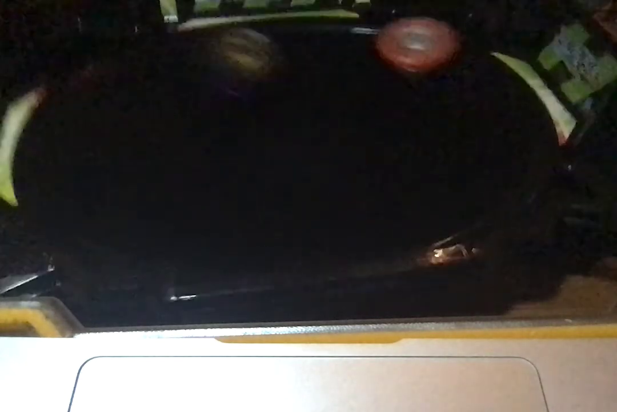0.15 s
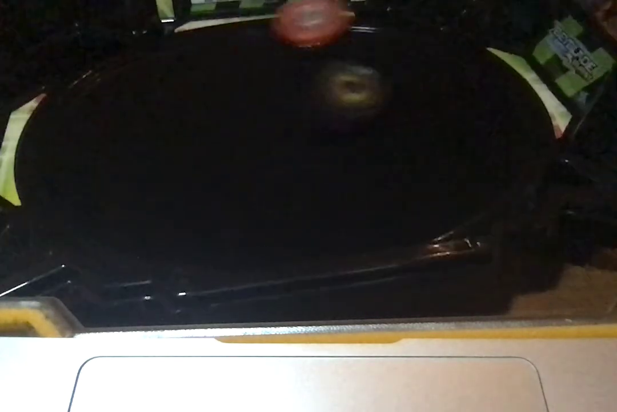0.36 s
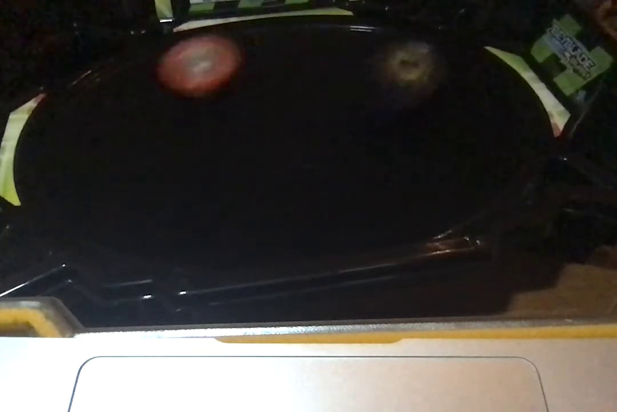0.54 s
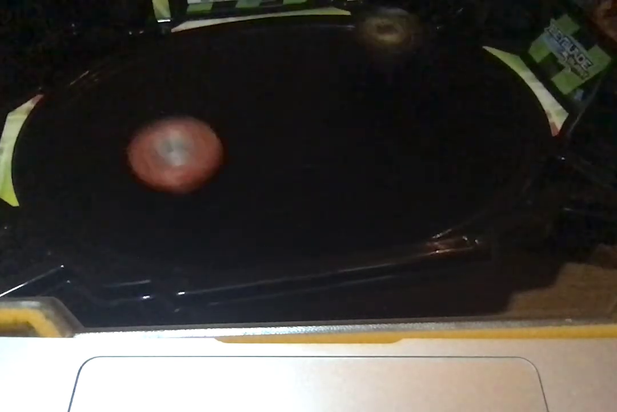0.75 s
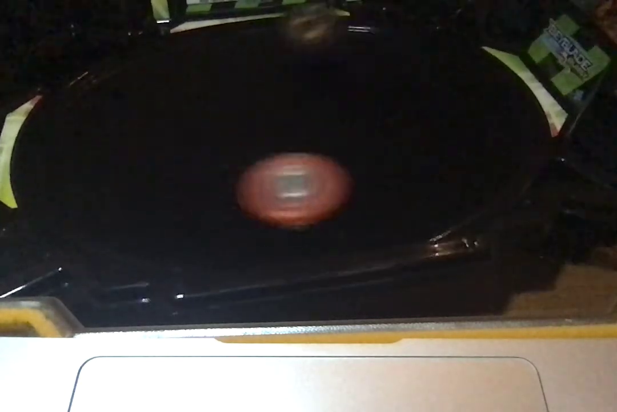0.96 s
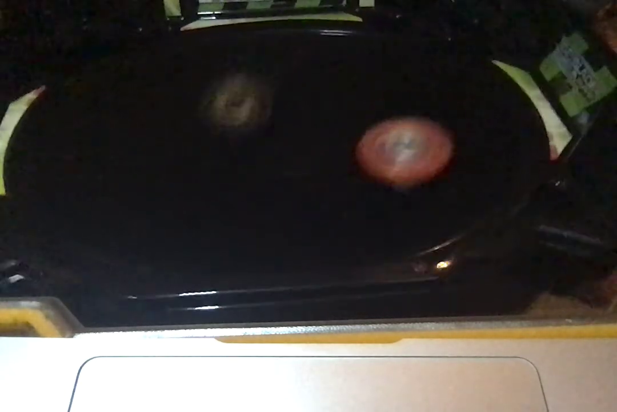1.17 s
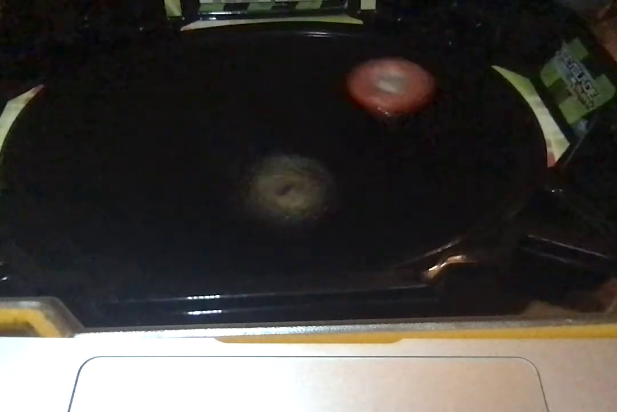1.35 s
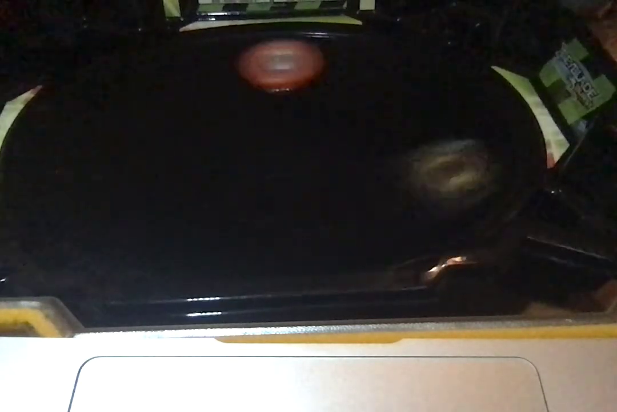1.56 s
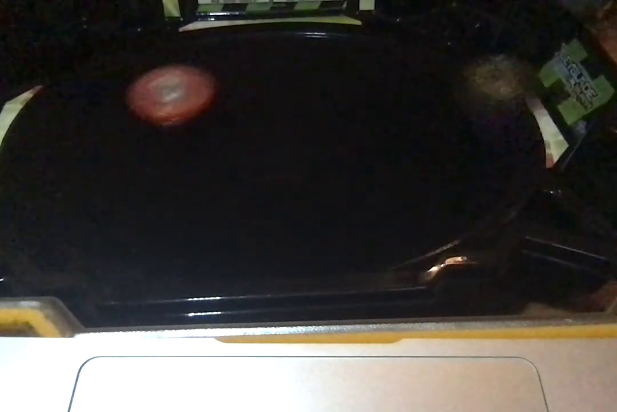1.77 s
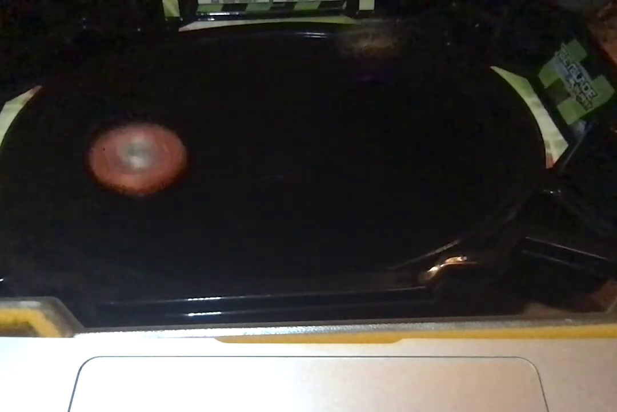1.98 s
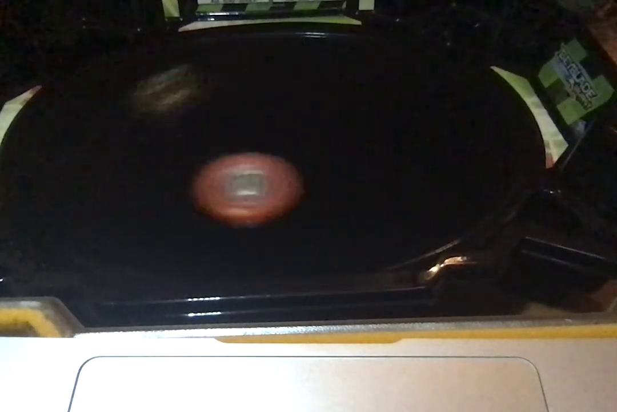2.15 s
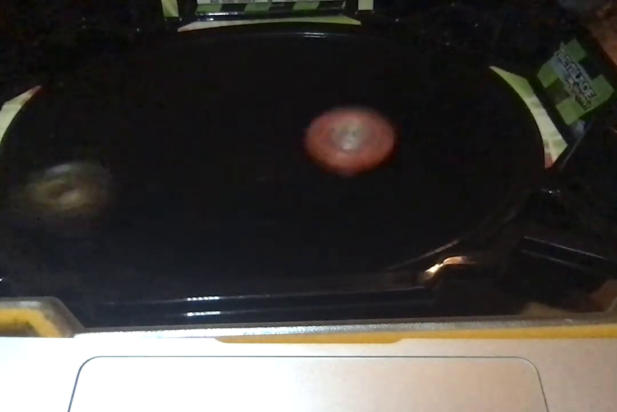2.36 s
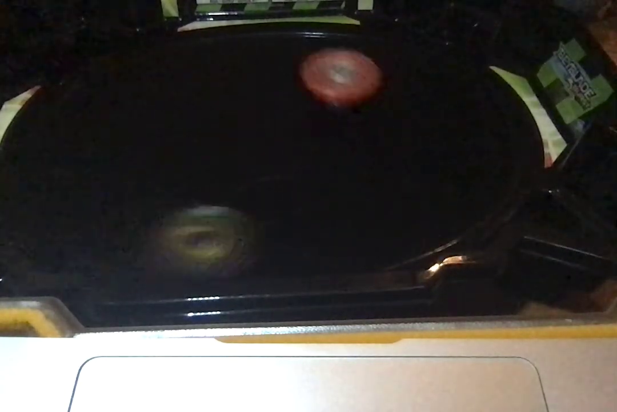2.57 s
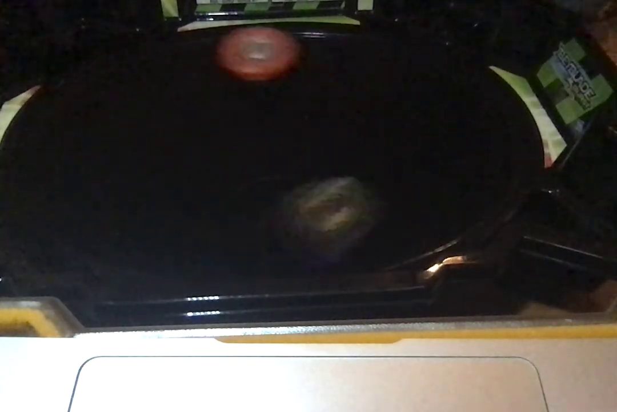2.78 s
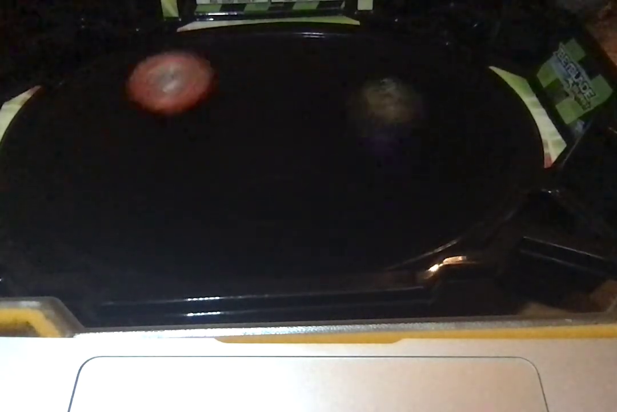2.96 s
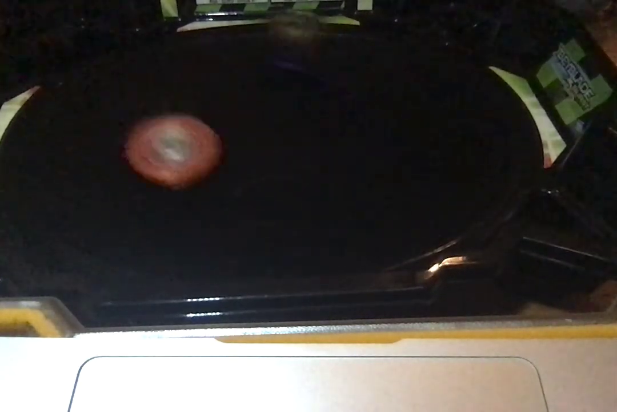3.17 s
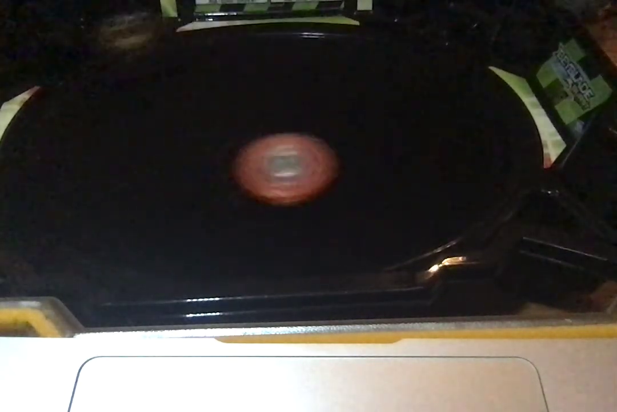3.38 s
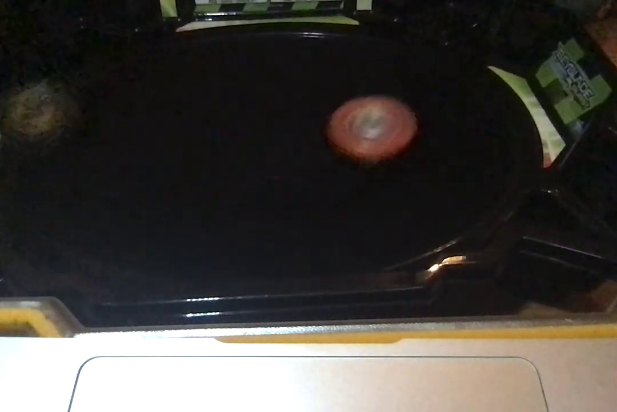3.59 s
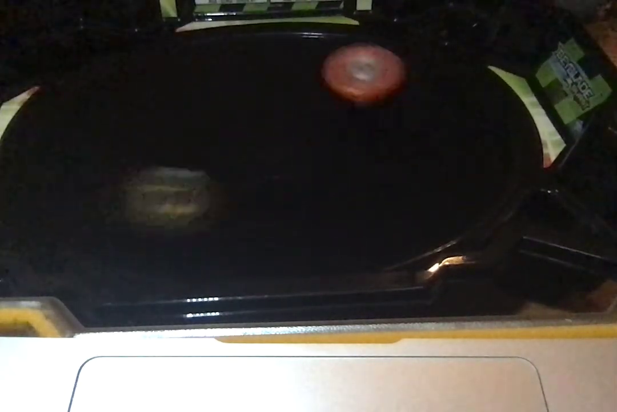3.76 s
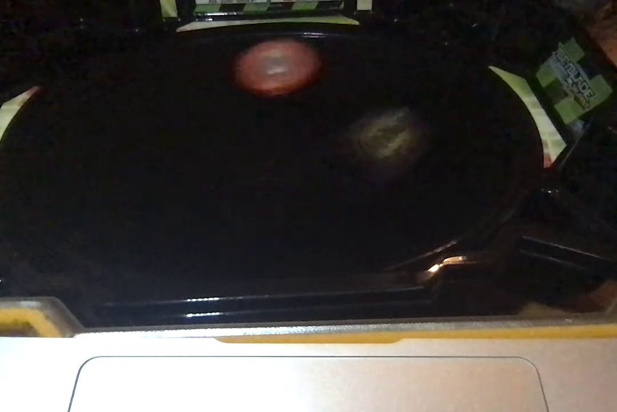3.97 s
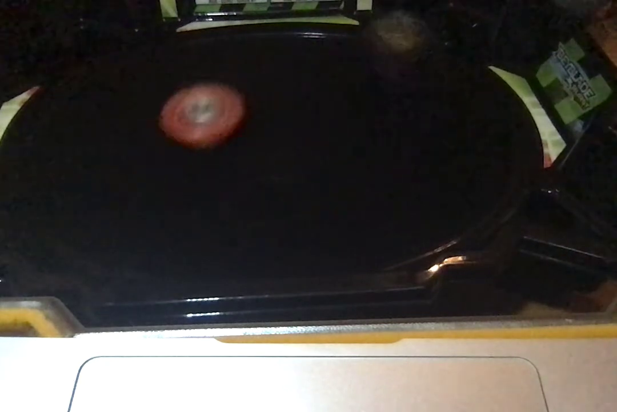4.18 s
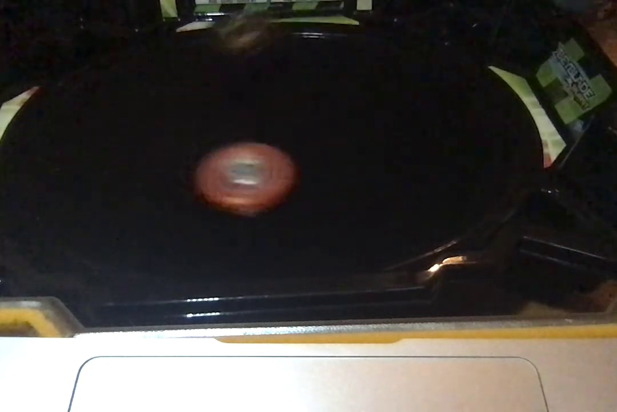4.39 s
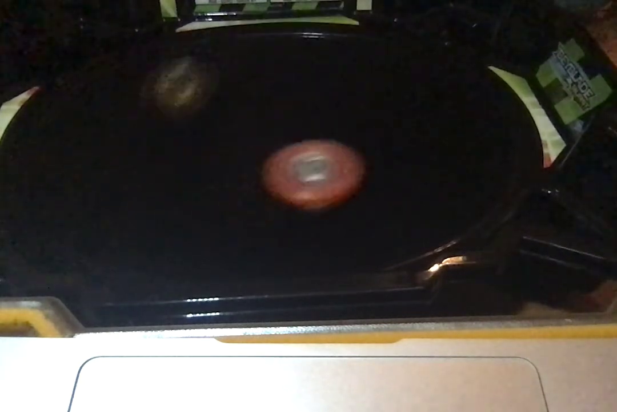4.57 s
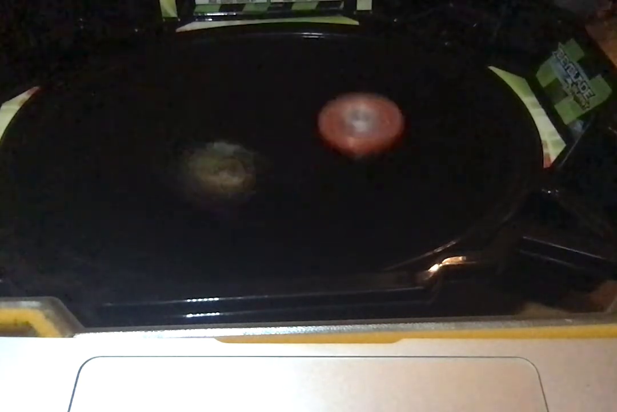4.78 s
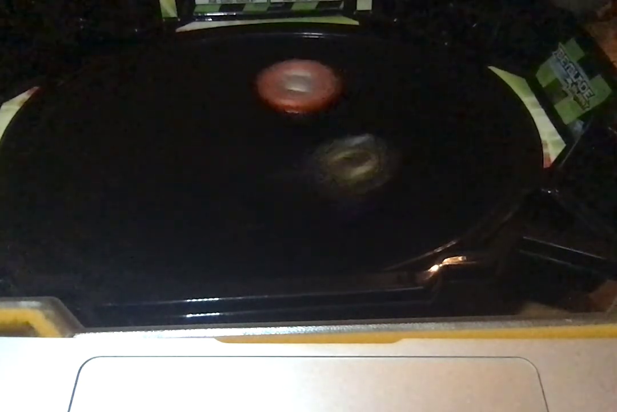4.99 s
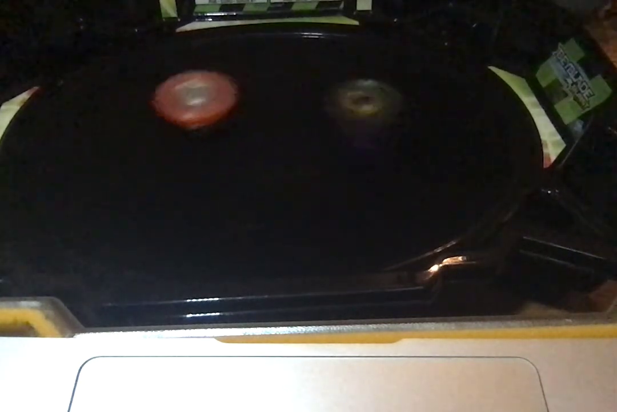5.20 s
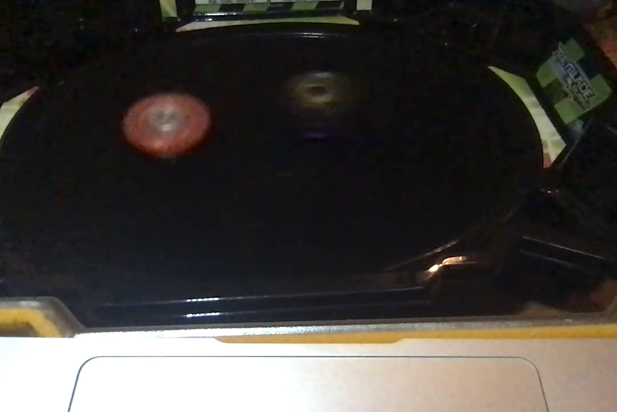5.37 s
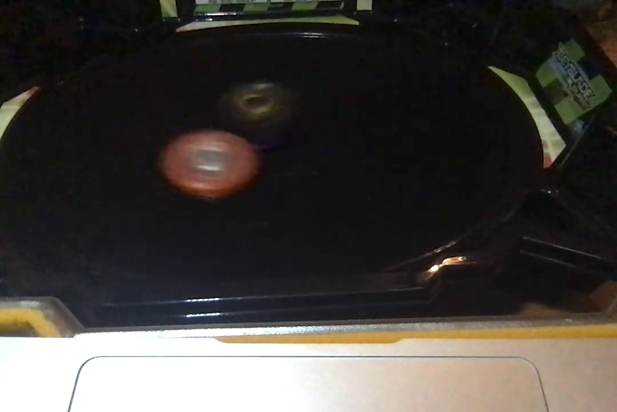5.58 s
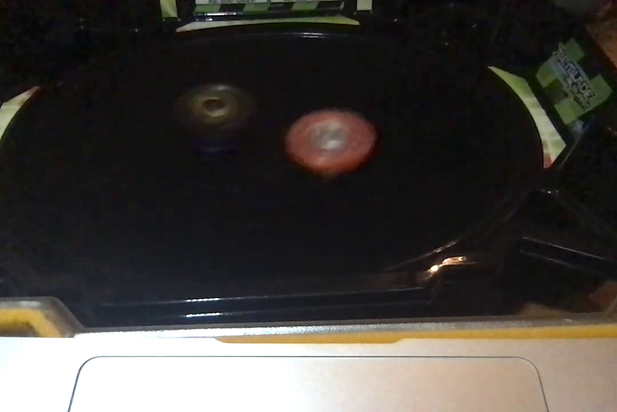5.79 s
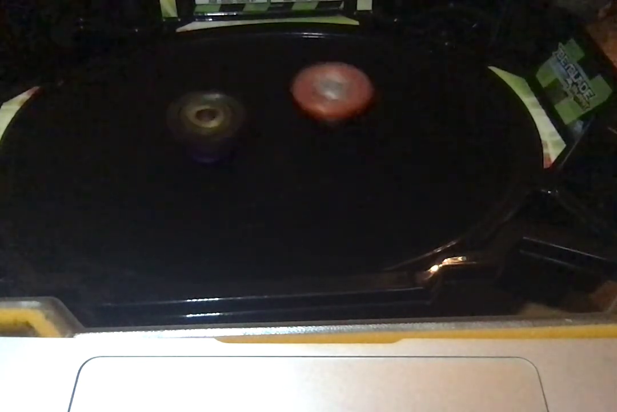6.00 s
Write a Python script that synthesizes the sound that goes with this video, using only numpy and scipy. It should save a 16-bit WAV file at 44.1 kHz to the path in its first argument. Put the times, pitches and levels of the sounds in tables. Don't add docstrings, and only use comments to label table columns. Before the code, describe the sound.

A quick ratchet click, then two or three heavy, distorted thuds as toy tops land in a thin plastic bowl. Uneven clattering and gritty scraping follow over a low, throbbing table rumble. Taps become rapid, even ticking runs and thin out. Near the end, metal rims clash once, sharply, and the low hum fades. The microphone is very close, on the same table, in a small room.

```python
import sys
import numpy as np
from scipy import signal
from scipy.fft import rfft, irfft, next_fast_len
from scipy.io import wavfile
from scipy.ndimage import uniform_filter1d, map_coordinates

SR = 44100
rng = np.random.default_rng(int(sys.argv[2]) if len(sys.argv) > 2 else 0)


def persist_wave(psi):
    counts = np.round(np.clip(psi, -1, 1) * 32767).astype(np.int16)
    wavfile.write(sys.argv[1], SR, np.atleast_2d(counts).T)


def volts(x):
    e = np.asarray(x, float) / 20
    return 10 ** e


N = 266364

# (time [s], level [dB])
LAUNCH_S_DB = [
    (0, -10),
    (.003, -7),
    (.012, -13),
    (.017, -21.5),
    (.021, -18),
    (.034, -16.5),
]
# (frequency [Hz], density [dB/Hz])
RATCHET_HZ_DB = [(180, -44.5), (300, -18.5), (1840, -24), (2320, -11), (7560, -1), (14700, -18),
                 (16000, -31)]
# (time [s], bowl rocking [dB], tip drag [dB])
SLIDE_S_DB = [(0, -28.5, -42), (.1, -25.5, -24.5), (.3, -27.5, -35), (.85, -36, -43), (1.25, -32, -33.5),
              (1.75, -41, -49), (2.2, -30.5, -36.5), (2.6, -37.5, -47.5), (3.1, -35, -44),
              (3.35, -37.5, -45.5), (3.52, -29, -47.5), (3.7, -50, -49), (4.3, -42, -53), (4.6, -43, -49.5),
              (4.85, -36, -48), (5.05, -55, -58), (5.35, -49, -55.5), (6.04, -61, -65.5)]
# (frequency [Hz], density [dB/Hz])
RUMBLE_HZ_DB = [(12, -38), (20, -13), (69, 0), (208, -20.5), (400, -35.5), (520, -61), (880, -120)]
# (frequency [Hz], width [Hz], level [dB])
FLOOR_HZ_HZ_DB = [(316, 110, -6), (431, 24, 2.5), (696, 225, 0.5), (930, 111, 2.5), (1127, 160, 1),
                  (1581, 324, -1), (1799, 470, -7), (2480, 130, -14.5)]
# (frequency [Hz], width [Hz], level [dB])
TIP_HZ_HZ_DB = [(3005, 690, -5.5), (3840, 420, -6.5), (4435, 640, -14), (6394, 465, 0), (6970, 540, 0.5),
                (8060, 630, 0.5), (9650, 180, -37.5), (12800, 1500, -32.5)]
# (time [s], peak [dB], first pitch [Hz], swell [s], direction [+1/-1])
THUDS_S_DB_HZ_S = [
    (.0365, 2.5, 175, .007, 1),
    (.1325, 3, 112, .0055, -1),
    (.174, -4.5, 125, .007, -1),
]
# (time [s], click [dB], floor knock re click [dB])
SKIPS_S_DB = [(0.1203, -36.5, 12), (0.1316, -23.5, 3), (0.176, -21.5, 9.5), (.2007, -25.5, 7),
              (0.2242, -22.5, 0.5), (0.2637, -26, 4.5), (0.3131, -21, -3), (.348, -20.5, -8.5),
              (0.3824, -22.5, -2), (0.4247, -19, -4), (0.47, -22.5, -6), (0.494, -36, 6),
              (0.5071, -24.5, 2), (0.5406, -30.5, 3), (0.5616, -25, -1.5), (0.5889, -31, 3.5),
              (.6081, -25.5, -2), (0.645, -19, -4.5), (0.6832, -31, 2.5), (0.701, -30, -12),
              (0.7239, -33.5, -2), (.749, -31, -5), (0.7721, -29.5, -0.5), (0.7918, -35, 2),
              (.851, -33, 1.5), (.8868, -32, -1.5), (0.926, -25, -1), (.9891, -31, -6.5),
              (1.0396, -36, -13), (1.0803, -26.5, -5.5)]
# (time [s], click [dB], floor knock re click [dB], bounce re click [dB])
BUMPS_S_DB = [(1.2708, -24, -4.5, -15), (1.2953, -18.5, -5, -8), (1.335, -21.5, 1.5, -15),
              (1.3757, -24, -2, -1.5), (1.4951, -29, 5, -12), (1.5418, -35.5, -1, -14),
              (1.5757, -27, 2, -22), (1.6953, -28.5, -4, -25), (1.7478, -44, 3.5, -3), (1.819, -37, -4, -6),
              (1.848, -36.5, -2.5, -4), (2.2166, -29, 0.5, -14), (2.2758, -27.5, -1, -1),
              (2.3038, -15.5, -1, -14), (2.3688, -26, 7.5, -21), (2.42, -34.5, 11, -21),
              (2.4576, -32.5, 8, -8), (2.4902, -34.5, 7.5, -15), (2.5593, -20, 8.5, -11),
              (3.2868, -17, -11.5, -30), (2.6586, -35, 9, -18), (2.6739, -30.5, 8.5, -17),
              (2.7044, -24, 1, -8.5), (2.747, -29, -2.5, -26), (2.952, -34.5, 5.5, -21),
              (3.4559, -22, -5.5, -23), (3.49, -33.5, -1, -15), (4.2077, -25, 5.5, -9.5),
              (4.2635, -28, -5, -22), (4.2988, -37, 1.5, -13)]
# (first tap [s], last tap [s], first level [dB], last level [dB], knock re tap [dB])
RUNS_S_DB = [(1.096, 1.1663, -32, -21.5, -7), (1.1533, 1.2568, -26, -24, -3.5),
             (1.4257, 1.464, -29.5, -31.5, 4), (1.613, 1.655, -33, -31.5, 4.5),
             (1.873, 2.155, -32, -26, -9), (1.8872, 2.233, -30.5, -26.5, 0),
             (2.784, 2.9114, -29.5, -29, -2.5), (2.9887, 3.2523, -28, -22.5, -7.5),
             (3.007, 3.175, -23.5, -40.5, -2), (3.346, 3.378, -35, -34.5, 3),
             (3.5462, 3.682, -32.5, -34.5, -1), (3.7, 3.914, -32, -26, -0.5),
             (3.933, 4.187, -29, -34, -1.5), (4.411, 4.5845, -35, -28.5, -1.5),
             (4.6049, 4.777, -29.5, -31, -2.5), (4.8, 4.8944, -26.5, -38, -3.5),
             (4.959, 5.013, -45.5, -50, 3.5), (5.255, 5.4387, -41, -40.5, -1)]
RUN_TAPS = [4, 5, 3, 4, 11, 13, 5, 9, 6, 2, 5, 13, 15, 10, 10, 6, 3, 10]
# (frequency [Hz], density [dB/Hz])
SNAP_HZ_DB = [(300, -28), (1500, -4), (5000, 1.5), (8000, -14), (16000, -38)]
# (time [s], spin [turns/s])
SPIN_S_HZ = [(.24, 64), (.9, 62), (1.7, 59), (2.5, 57.5), (4.1, 55), (4.5, 52), (4.9, 51), (5.35, 48.5),
             (6.04, 45)]
# (time [s], once-a-turn shake [dB], twice-a-turn rock [dB])
WOBBLE_S_DB = [(.24, -33.5, -51), (.82, -21.5, -53), (1.1, -35, -56), (1.4, -21.5, -58), (1.84, -40, -56),
               (2.27, -22, -59), (2.85, -43, -65), (3.14, -27, -66), (3.55, -38, -57), (3.72, -28, -28),
               (3.86, -21.5, -45), (4.01, -40, -25), (4.25, -31.5, -44), (4.59, -36.5, -30),
               (4.85, -29.5, -38.5), (5.08, -38, -47.5), (5.319, -32, -46.5), (6.04, -43.5, -44.5)]
# (time [s], rate [hops/s])
HOP_S_HZ = [(.3, 43), (1.2, 39.5), (2, 35.2), (2.35, 34), (3.15, 30.3), (3.6, 29.5)]
# (time [s], once-a-hop heave [dB], once-a-turn shake [dB], landing slap [dB])
HEAVE_S_DB = [(0.3, -36, -49, -45), (0.52, -27, -23, -34), (0.74, -26, -37, -36), (0.96, -41, -42, -49.5),
              (1.18, -28, -27, -31), (1.4, -30, -28, -35.5), (1.62, -32, -31, -42.5),
              (1.84, -39, -28.5, -35.5), (2.06, -38, -33, -30), (2.28, -25, -17.5, -32.5),
              (2.5, -32.5, -36, -39.5), (2.72, -28.5, -25.5, -36), (2.94, -34, -64, -36),
              (3.16, -29.5, -52, -26), (3.38, -36, -43, -50), (3.6, -49, -32, -51)]
# (time [s], level [dB])
CLASH_S_DB = [
    (5.575, -34.5),
    (5.580, -24),
    (5.599, -9),
    (5.621, -35),
]
# (frequency [Hz], density [dB/Hz])
CRACK_HZ_DB = [(180, -59), (300, -18), (2070, -12), (3240, -9.5), (4020, -13.5), (6960, 1), (9230, -1),
               (16000, -21)]
# (frequency [Hz], t60 [s])
ROOM_HZ_S = [(1000, 0.35), (9000, 0.36), (13000, 0.04)]
# (frequency [Hz], density [dB/Hz])
HUSH_HZ_DB = [(150, -42.5), (250, -11), (631, -15.5), (846, -5), (1280, -28.5), (8800, -29), (10500, -56),
              (22000, -120)]

SETTLE_S, SLOW_S = 3.6, 4.95


def unit(x):
    return x / np.sqrt(np.mean(x ** 2) + 1e-20)


def along(points, hz):
    f, v = np.transpose(points)
    return np.interp(np.log(hz + 1), np.log(f + 1), v)


def curves(rows):
    s, *cols = np.transpose(rows)
    return [np.interp(np.arange(N) / SR, s, c) for c in cols]


def wobble(rate_hz):
    knots = rng.standard_normal(int(N * rate_hz / SR) + 4)
    return map_coordinates(knots, [np.arange(N) * rate_hz / SR])


def filtered(x, response):
    m = next_fast_len(N + SR // 2)
    return irfft(rfft(x, m) * response(np.fft.rfftfreq(m, 1 / SR)), m)[..., :N]


def body(modes):
    def response(f):
        total = 0
        for k, (hz, width_hz, db) in enumerate(modes):
            damping = 1j * f * width_hz
            total = total + (-1) ** k * volts(db) * damping / (hz * hz - f * f + damping)
        return total
    return response


def dull(hz):
    return 1 / np.sqrt(1 + (hz / 9300) ** 6)


def muffled(hz):
    return dull(hz) ** 4


def noise(spectrum):
    return unit(filtered(rng.standard_normal(N), lambda hz: volts(along(spectrum, hz))))


def chatter(spiky_db):
    return volts(spiky_db * wobble(2500)) * rng.standard_normal(N)


def bursts(s, db, rise_s, fall_s):
    t = np.arange(SR // 4) / SR
    swell = (t / rise_s) ** 2
    shape = swell / (1 + swell) * np.exp(-t / fall_s)
    kicks = np.bincount(np.round(s * SR).astype(int), volts(db), N)[:N]
    return signal.fftconvolve(kicks, shape / shape.max())[:N]


def crack(hits, spectrum, fall_s):
    s, db = np.transpose(hits)
    contact = chatter(0.83) * bursts(s, db + 6.5, 0.000074, fall_s)
    return filtered(contact, lambda hz: volts(along(spectrum, hz)))


def launcher():
    return crack(LAUNCH_S_DB, RATCHET_HZ_DB, fall_s=0.0047)


def slide():
    rumble_db, drag_db = curves(SLIDE_S_DB)
    rumble = volts(rumble_db + 4.5 + 3.1 * wobble(25.1)) * noise(RUMBLE_HZ_DB)
    grains = volts(3 * wobble(70)) * rng.standard_normal(N)
    drone = unit(filtered(grains, body(FLOOR_HZ_HZ_DB)))
    rub = volts(4.5 * wobble(130) + 6.3 * wobble(900)) * rng.standard_normal(N)
    hiss = unit(filtered(rub, lambda hz: body(TIP_HZ_HZ_DB)(hz) + 0.63 * (hz > 1500)))
    drone_db = drag_db - 3
    hiss_db = 1.27 * (drag_db + 39.5) - 43 - 5
    return rumble + volts(drone_db) * drone + volts(hiss_db) * hiss


def grit():
    rate_per_s, level_db, spread_db, growth = 140, -3.5, 3.5, 1.01
    top_db = -33
    luck = rng.random((round(rate_per_s * N / SR), 2))
    s = luck[:, 0] * (N - 1) / SR
    drag_db = np.interp(s, *np.transpose(SLIDE_S_DB)[[0, 2]])
    db = growth * (np.minimum(drag_db, top_db) + 39) - 40 + level_db
    db = db - spread_db * np.log(1 - luck[:, 1])
    ticks = chatter(5.0) * bursts(s, db, rise_s=0.0016, fall_s=0.002)
    return filtered(ticks, lambda hz: dull(hz) ** 2 * (body(TIP_HZ_HZ_DB)(hz) + 0.34 * (hz > 1600)))


def thuds():
    swing, t = np.zeros(N + SR), np.arange(SR // 4) / SR
    sag_s = .0075
    for s, db, hz, swell_s, way in THUDS_S_DB_HZ_S:
        cycles = hz * (.2 * t + .8 * sag_s * (1 - np.exp(-t / sag_s)))
        envelope = t / swell_s * np.exp(1 - t / swell_s)
        swing[round(s * SR):][:len(t)] += way * volts(db) * envelope * np.sin(2 * np.pi * cycles)
    s, db = np.transpose(THUDS_S_DB_HZ_S)[:2]
    shudder = noise(RUMBLE_HZ_DB) * bursts(s + 0.018, db - 24, rise_s=0.011, fall_s=0.045)
    rattle_db = db - 1.5 - 6 * np.arange(len(s))
    rattle = chatter(4.5) * bursts(s + 0.0022, rattle_db, rise_s=0.0017, fall_s=0.0088)
    return swing[:N] + shudder + filtered(rattle, body(FLOOR_HZ_HZ_DB))


def touches():
    runs = []
    for (start_s, end_s, start_db, end_db, knock_db), count in zip(RUNS_S_DB, RUN_TAPS):
        u = np.linspace(0, 1, count)
        lean_db = 2 * np.sin(np.pi * u)
        db = start_db + (end_db - start_db) * u + lean_db
        runs.append(np.c_[start_s + (end_s - start_s) * u, db, knock_db + 0 * u])
    steady = np.concatenate(runs)
    steady = steady + rng.standard_normal(steady.shape) * [.0005, 1.1, 1.5]
    skips = [tuple(row) + (-7,) for row in SKIPS_S_DB]
    s, db, knock_db, bounce_db = np.transpose(skips + list(BUMPS_S_DB))
    flight_s = .012 + .0005 * (db + knock_db + 25)
    again = np.c_[s + flight_s, db + bounce_db, knock_db + 0.5]
    again = again + rng.standard_normal((len(s), 3)) * [.001, 1.8, 2.5]
    return np.concatenate([np.c_[s, db, knock_db], again, steady]).T


def struck(s, db, modes, rise_s, fall_s, colour_db, spiky_db):
    t, f = np.arange(2048) / SR, np.fft.rfftfreq(2048, 1 / SR)
    slips = rng.standard_normal((2, len(s), len(t)))
    chance, detune = rng.standard_normal((2, len(s), len(modes), 1))
    u = t / (volts(1.45 * slips[1][:, :1]) * fall_s)
    shape = np.sin(np.pi / 2 * np.minimum(t / rise_s[:, None], 1)) ** 2 * np.exp(-u)
    force = shape * slips[0] * volts(spiky_db * 4 * uniform_filter1d(slips[1], size=16))
    moved = []
    for k, (hz, width_hz, mode_db) in enumerate(modes):
        moved.append((hz * (1 + .04 * detune[:, k]), width_hz, mode_db + colour_db * chance[:, k]))
    rung = irfft(rfft(force) * body(moved)(f))
    rung *= (volts(db) / np.linalg.norm(rung, axis=1))[:, None]
    where = np.round((s - rise_s) * SR).astype(int)[:, None] + np.arange(len(t))
    return np.bincount(where.ravel(), rung.ravel(), N)[:N]


def taps(s, db, knock_db):
    hit_db = db + knock_db
    rise_s = np.clip(.0035 * volts(-.9 * (hit_db + 28)), .0005, .0035)
    click = struck(s + .0012, db + 18, TIP_HZ_HZ_DB, rise_s, fall_s=0.0023, colour_db=4.5, spiky_db=1.5)
    boom = struck(s + 0.00153, hit_db + 17.5, FLOOR_HZ_HZ_DB, rise_s,
                  fall_s=0.0031, colour_db=3.5, spiky_db=2.5)
    scrape = chatter(0.73) * volts(6.0 * wobble(150)) * bursts(s, db - 15.5, rise_s=0.0018, fall_s=0.011)
    drag = filtered(scrape, body(TIP_HZ_HZ_DB))
    rub = volts(1.44 * wobble(90)) * chatter(2.6) * bursts(s, hit_db + 0.5, rise_s=0.0016, fall_s=0.0096)
    drone = filtered(rub, body(FLOOR_HZ_HZ_DB))
    thump = noise(RUMBLE_HZ_DB) * bursts(s, hit_db - 11, rise_s=0.0029, fall_s=0.0079)
    snap_db = 1.6 * (hit_db + 15) - 15 - 11
    snap = crack(np.c_[s, snap_db], SNAP_HZ_DB, fall_s=0.0019)
    return snap + filtered(click, dull) + filtered(drag, muffled) + boom + drone + thump


def shake(speed, rows, drift, flutter_db):
    rate_hz = curves(speed)[0] * (1 + drift * wobble(5.82))
    turn = 2 * np.pi * np.cumsum(rate_hz) / SR
    t = np.arange(N) / SR
    fade_in = np.clip((t - rows[0][0]) * 15, 0, 1)
    fade_out = np.clip((rows[-1][0] + 0.14 - t) * 15, 0, 1)
    total = np.zeros(N)
    for order, db in enumerate(curves(rows), 1):
        level = volts(db + flutter_db * wobble(13))
        total += level * np.sin(order * turn + rng.uniform(0, 2 * np.pi))
    return fade_in * fade_out * np.sqrt(2) * total


def first_top():
    rows = []
    for s, one_db, two_db in WOBBLE_S_DB:
        three_db = max(one_db, two_db) - 22 - 20 * (not SETTLE_S < s < SLOW_S)
        four_db = one_db - 24 - 20 * (s < SLOW_S)
        rows.append((s, one_db, two_db, three_db, four_db))
    roaming = np.arange(N) < SETTLE_S * SR
    return shake(SPIN_S_HZ, rows, drift=np.where(roaming, .022, .004),
                 flutter_db=np.where(roaming, 2.6, 1.5))


def second_top():
    rows = [(s, one, two, slap, slap - 4) for s, one, two, slap in HEAVE_S_DB]
    return shake(HOP_S_HZ, rows, drift=0.016, flutter_db=1.65)


def whistle(s, db):
    fast = (s > .6) & (s < 2.15)
    scrape = chatter(2.3) * bursts(s[fast], 0.42 * db[fast] - 30.5, rise_s=0.0017, fall_s=0.0055)
    return filtered(scrape, body([(13200, 790, -6.0)]))


def clash():
    s, db = np.transpose(CLASH_S_DB)
    wash = filtered(noise(CRACK_HZ_DB), muffled) * bursts(s + .006, db - 29, rise_s=.004, fall_s=0.041)
    jolt = noise(RUMBLE_HZ_DB) * bursts(s, db - 24, rise_s=.008, fall_s=0.04)
    return crack(CLASH_S_DB, CRACK_HZ_DB, fall_s=0.0032) + jolt + wash


def room(x):
    hz, t, z = signal.stft(rng.standard_normal(SR // 2), SR, nperseg=256)
    decay = volts(-60 * t / along(ROOM_HZ_S, hz)[:, None])
    tail = signal.istft(z * decay, SR, nperseg=256)[1]
    return signal.fftconvolve(np.pad(x, (200, 0)), tail / np.linalg.norm(tail))[:N]


def scene():
    s, db, knock_db = touches()
    tips = taps(s, db, knock_db) + whistle(s, db) + grit()
    rims = launcher() + clash()
    low = first_top() + second_top() + thuds()
    walls = filtered(room(volts(-18) * tips + volts(-20) * rims), muffled)
    rubbing = filtered(slide(), muffled)
    hush = volts(-60.0) * noise(HUSH_HZ_DB)
    return (tips + rims + walls + low + rubbing + hush)[None]


def top_cut(x):
    return signal.sosfilt(signal.butter(12, 16140, fs=SR, output="sos"), x)


def record(dry):
    top_hz, edge_hz = 16200, 1200
    clipped = dry / (1 + np.abs(dry / .73) ** 14) ** (1 / 14)
    mix = filtered(clipped, lambda hz: np.clip((top_hz - hz) / edge_hz, 0, 1))
    return top_cut(mix)


dry = scene()
out = record(dry)
persist_wave(out)
```